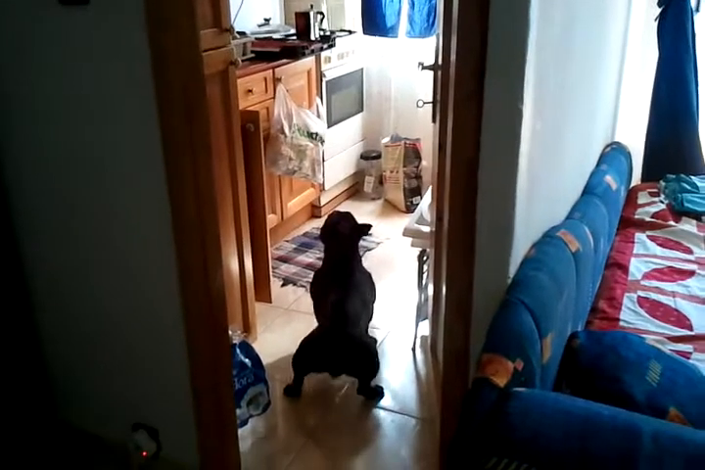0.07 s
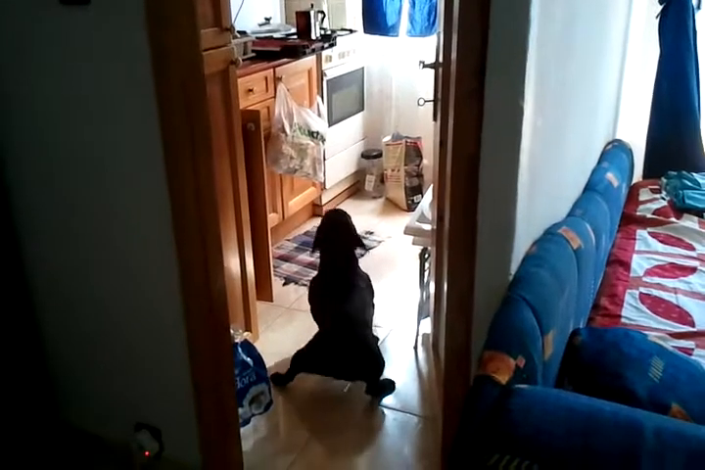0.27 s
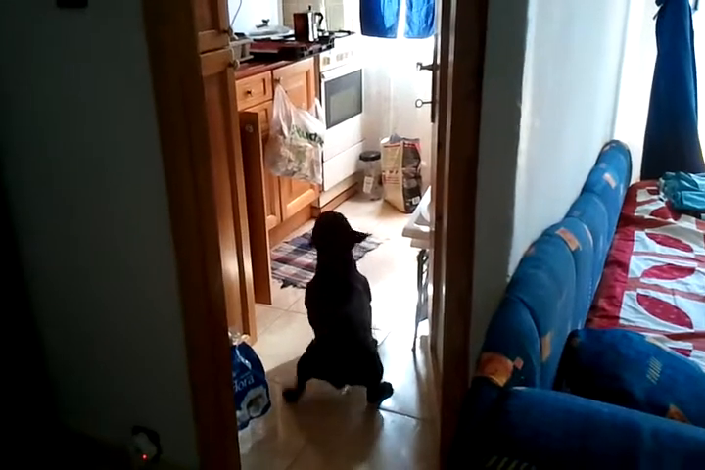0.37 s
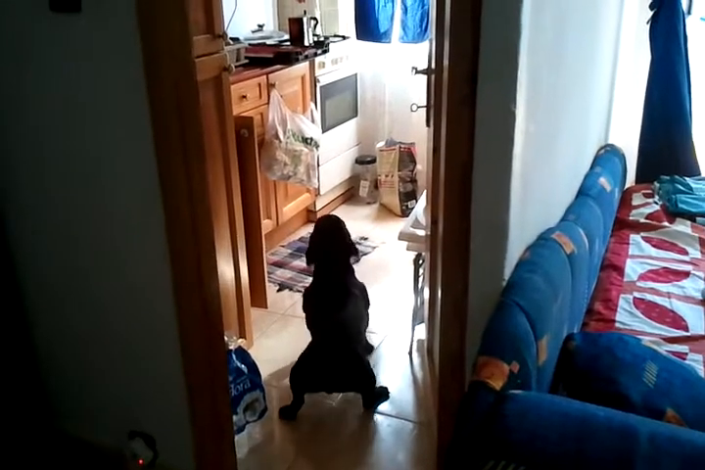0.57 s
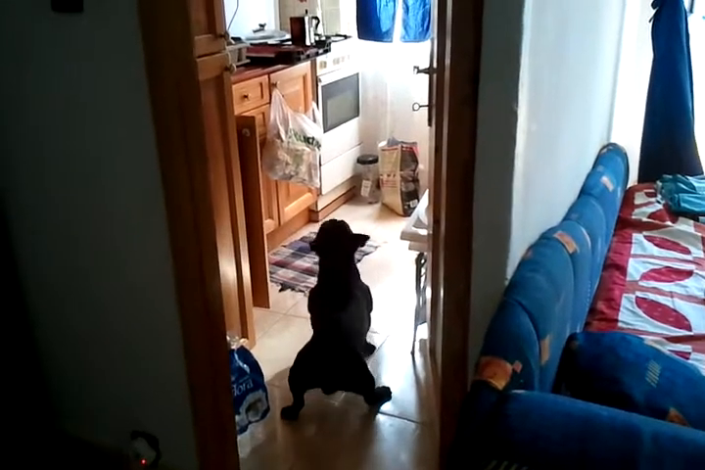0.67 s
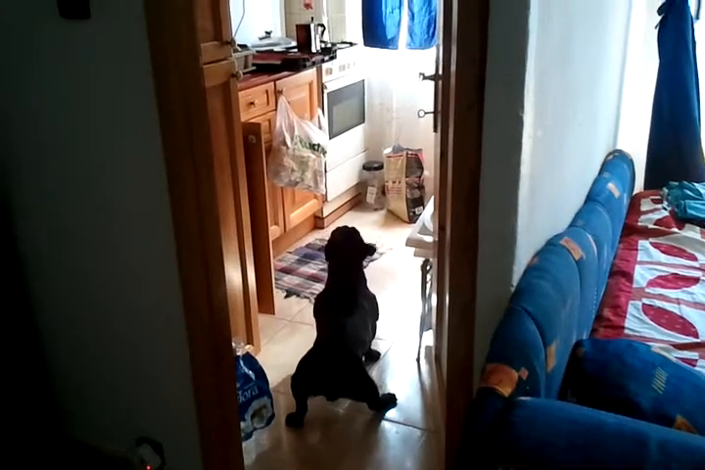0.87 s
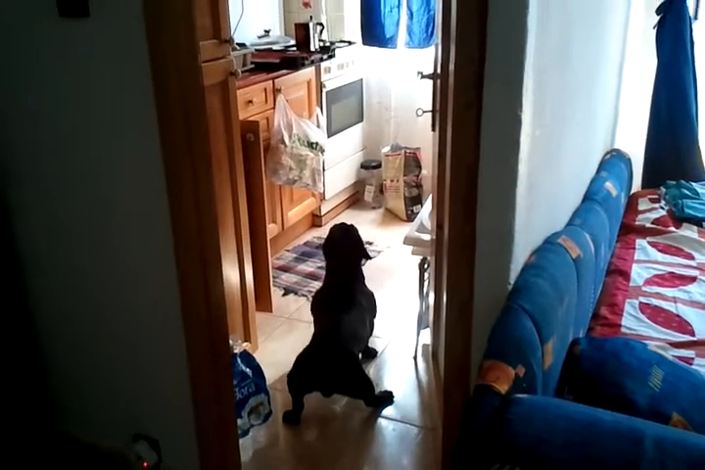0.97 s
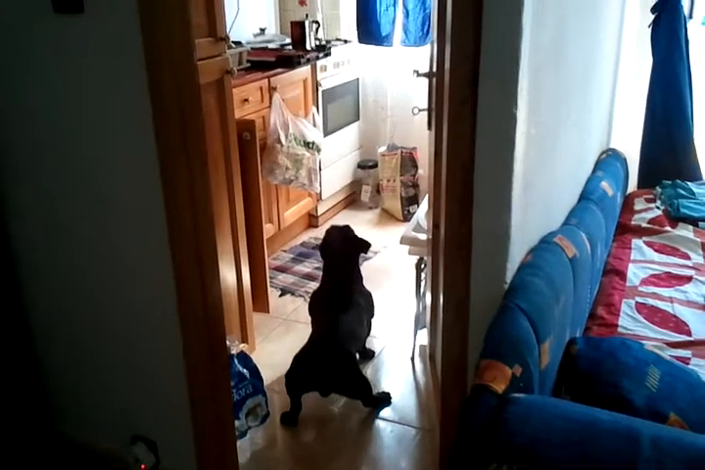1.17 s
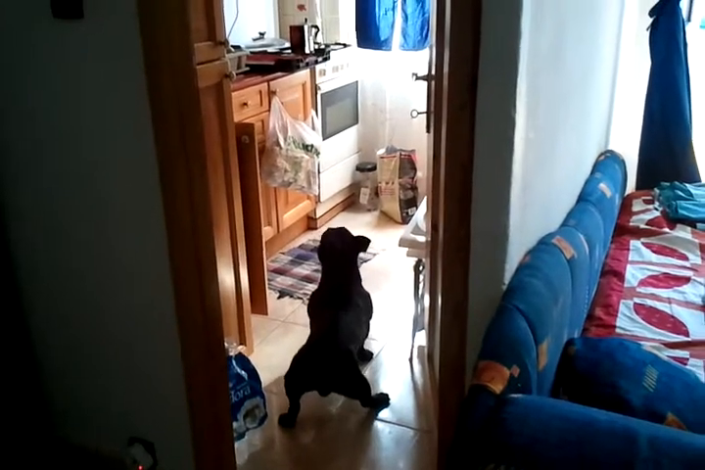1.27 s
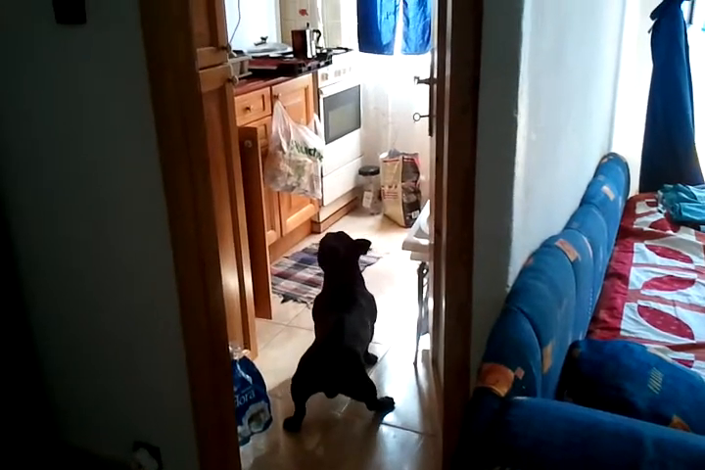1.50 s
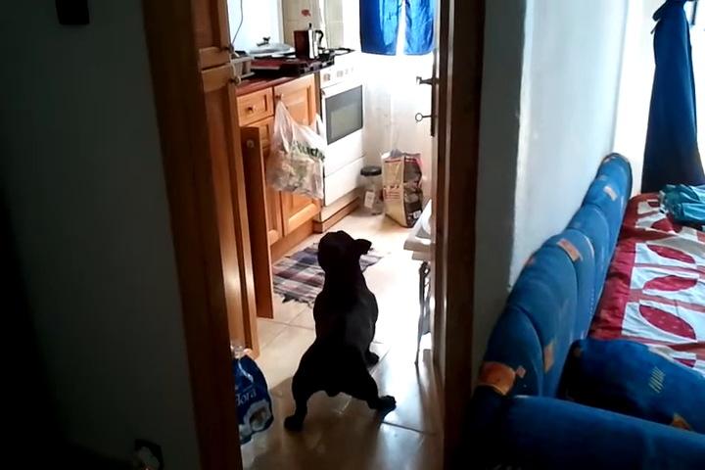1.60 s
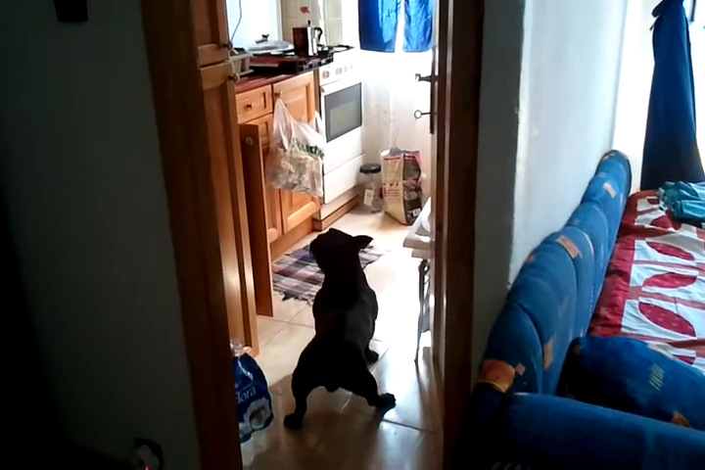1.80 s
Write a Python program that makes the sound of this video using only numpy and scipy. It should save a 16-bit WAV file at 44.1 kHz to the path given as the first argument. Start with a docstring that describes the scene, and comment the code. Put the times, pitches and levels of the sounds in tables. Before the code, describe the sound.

In a kitchen doorway, a small dog huffs out two quick, raspy barks. A soft, low growl and faint sniffing follow, with a little room echo and quiet background noise.

```python
"""In a kitchen doorway, a small dog gives two hoarse, huffing barks, then sniffs and growls softly.
Uneven throat pulses and puffs of air make its muzzle ring around one strong, shaky tone,
while more air rasps past its teeth. The growl is slower pulses behind a shut mouth.
The hard-floored rooms ring on at a few low notes, over a faint hum."""
import sys
import numpy as np
from scipy import signal
from scipy.fft import rfft, irfft
from scipy.io import wavfile
from scipy.ndimage import uniform_filter1d

SR = 44100
rng = np.random.default_rng(int(sys.argv[2]) if len(sys.argv) > 2 else 0)


def materialize(psi):
    """Save the field psi as 16-bit PCM at rate SR to the path in sys.argv[1].

    A 1-D psi becomes a single channel; in a 2-D psi each row is a channel.
    """
    bounded = np.clip(np.atleast_2d(psi).T, -1, 1)
    quanta = np.round(bounded * 32767).astype(np.int16)
    wavfile.write(sys.argv[1], SR, quanta)


N = 81585
T = np.arange(N) / SR


# Resonances (pitches that ring) of the muzzle: pitch_hz, width_hz, gain_db
MUZZLE_RESONANCES = [(1328, 300, -8), (1604, 88, -10), (1790, 194, -8), (2640, 420, -30.5)]
# The barks: start_s, rise_s, hold_until_s, fall_s, widest_mouth_s, level_db, swell_db, pitch_hz,
# jaw_open_hz, jaw_drop_hz, jaw_width_hz, chest_db, muzzle_sag_share, back_of_mouth_db
BARK_SHAPES = [(.216, 0.0028, .345, .045, .3, -37.5, 1, 300.7, 632, 49, 347, -9, 0.002, -4.5),
               (.515, 0.022, 0.66, 0.033, .625, -34, 8.5, 249.8, 612, 147, 208, -6.5, 0.14, -5.5)]
def bark(start, rise, until, fall, widest, level_db, swell_db, pitch_hz,
         jaw_hz, jaw_drop_hz, jaw_width_hz, chest_db, sag, back_db):
    """The opening mouth lifts level, pitch and jaw resonance; the muzzle rings lower as lips round."""
    moments = [start, widest, until + fall]
    shut = np.interp(T, moments, [1, 0, 1])
    rounding = np.interp(T, moments, [-.5, .5, 1])
    pulses = throat(pitch_hz * (1 + .25 * (.5 - shut)), jitter=.16, air_share=.7)
    jaw = gliding_resonance(pulses, jaw_hz - jaw_drop_hz * shut, jaw_width_hz)
    chest = from_db(chest_db - 12.5 * rounding) * resonance(pulses, hz=319, width_hz=173)
    back_of_mouth = (885, 295, back_db)
    muzzle = 0
    for k, (hz, width_hz, db) in enumerate([back_of_mouth] + MUZZLE_RESONANCES):
        ringing = gliding_resonance(pulses, hz * (1 - sag * rounding), width_hz)
        muzzle += from_db(db) * ringing * (-1) ** k
    level = envelope(start, rise, until, fall, level_db - swell_db * shut)
    voice = level * (jaw - chest - from_db(-4 * shut) * muzzle)
    return signal.sosfilt(signal.butter(2, 170, "high", fs=SR, output="sos"), voice)


def throat(hz, jitter, air_share):
    """The throat makes pulses of uneven spacing and strength, each followed by a puff of air."""
    cycles = np.cumsum(hz * np.exp(jitter * waver(np.mean(hz)))) / SR
    strength = from_db(2 * rng.standard_normal(N))[cycles.astype(int)]
    pulses = np.diff(np.floor(cycles), prepend=0) - hz / SR
    puffs = rng.standard_normal(N) * np.exp(-3 * (cycles % 1))
    return strength * (np.sqrt(1 - air_share) * rms_one(pulses) + np.sqrt(air_share) * rms_one(puffs))


# The strong tone inside each bark, one list of points per bark: time_s, pitch_hz, level_db
CORE_TONES = [
    [(.21, 310, -49), (.237, 331.3, -39.5), (.275, 388.5, -38), (.3, 443.8, -46), (.335, 492, -42.5),
     (.375, 566.6, -37.5), (.41, 594, -47)],
    [(.54, 489.6, -48), (.572, 517.3, -34), (.594, 529, -36), (.619, 577.5, -28.5), (.632, 590, -46),
     (.655, 610, -36), (.672, 481, -37), (.7, 447.3, -38.5), (.73, 453, -43)],
]
def core_tone(points, flutter):
    """One shaky tone of the voice climbs as the mouth opens; the throat's flutter chops it when loud."""
    times, hz, db = np.transpose(points)
    cycles = np.cumsum(np.interp(T, times, hz) * np.exp(.046 * waver(hz=188))) / SR
    effort_db = np.interp(T, times, db)
    loudest_db = max(point[2] for tone in CORE_TONES for point in tone)
    fade_s, flutter_range_db = .025, 14.5
    depth = np.clip(1 + (effort_db - loudest_db) / flutter_range_db, 0, 1)
    shaky_db = effort_db + 3.5 * waver(hz=119.8)
    level = envelope(times[0], fade_s, times[-1] - fade_s, fade_s, shaky_db)
    return level * (1 + depth * flutter) * np.sin(2 * np.pi * cycles)


# The breath in each bark: start_s, rise_s, hold_until_s, fall_s, air_db, flutter_hz, thrum_db
HUFF_SHAPES = [(0.205, 0.023, 0.32, 0.065, -44.5, 118.6, -57), (0.5, 0.032, 0.61, 0.077, -45.5, 94, -56.5)]
def huff(tone_points, start, rise, until, fall, air_db, flutter_hz, thrum_db):
    """The throat flutters, thrumming low and chopping both the core tone and the rushing air."""
    cycles = np.cumsum(flutter_hz * np.exp(.1323 * waver(flutter_hz))) / SR
    flutter = np.sin(2 * np.pi * cycles)
    rasp = envelope(start, rise, until, fall, air_db) * teeth_rasp(start, flutter)
    thrum = envelope(start, rise, until, fall, thrum_db) * flutter
    return rasp + thrum + core_tone(tone_points, flutter)


# Tone colour of air rushing past the teeth: pitch_hz, relative_db
TEETH_HISS = [(1000, 11), (2000, 12), (2400, 7), (2950, 3.5), (3300, 0), (4000, 5), (4800, 6), (5400, -1.5),
              (6300, 4), (7500, 6), (9500, 6.5), (12500, 1.5), (14500, -7)]
# Narrow resonances between teeth and lips: pitch_hz, width_hz, gain_db
TEETH_RESONANCES = [(2860, 280, -15.5), (4060, 340, -19.5), (4640, 220, -29), (7430, 170, -21),
                    (8880, 230, -17.5), (12300, 390, -20)]
def teeth_rasp(start, flutter):
    """Air hisses past the teeth, and the gaps begin to ring as the lips part."""
    air = rng.standard_normal(N)
    wander = 1 + .018 * waver(hz=13.4)
    ringing = sum(from_db(db) * gliding_resonance(air, hz * wander, width_hz)
                  for hz, width_hz, db in TEETH_RESONANCES)
    lips_apart = np.clip((T - start) / .065, 0, 1)
    return rms_one((coloured(air, TEETH_HISS) + ringing * lips_apart) * (1 + .25 * flutter))


def lip_pop(start_s=.2195, pitch_hz=643, ring_s=.039, level_db=-25):
    """The lips pop open on the first bark, and the trapped air rings the mouth."""
    age = np.maximum(T - start_s, 0)
    rise = np.minimum(2 * pitch_hz * age, 1)
    return rise * from_db(level_db - 60 * age / ring_s) * np.sin(2 * np.pi * pitch_hz * age)


# Muffled grunts around the barks: start_s, rise_s, hold_until_s, fall_s, chest_db, throat_db
GRUNT_SHAPES = [(0.187, 0.0071, 0.23, 0.024, -61.5, -50.5), (0.389, 0.018, 0.439, 0.015, -53, -78),
                (0.497, 0.034, .55, 0.012, -52, -43), (0.674, 0.015, 0.705, 0.043, -52.5, -68)]
def grunts():
    """A low voice behind nearly closed lips leads into each bark and trails after it."""
    pulses = throat(np.full(N, 196.4), jitter=.15, air_share=.72)
    chest = resonance(pulses, hz=230, width_hz=39)
    upper = throat_ring(pulses)
    return sum(envelope(*times, chest_db) * chest + envelope(*times, throat_db) * upper
               for *times, chest_db, throat_db in GRUNT_SHAPES)


# How the growl swells and sinks: time_s, effort_db, chest_resonance_hz
GROWL_CURVE = [(0.932, -61, 188), (1.021, -62.5, 177), (1.114, -58, 169), (1.15, -55, 194),
               (1.284, -56, 188), (1.32, -53, 176), (1.39, -50.5, 183), (1.465, -51, 165),
               (1.51, -55.5, 190), (1.63, -55, 170), (1.7, -58, 134), (1.85, -58.5, 132)]
def growl(pulse_hz=53.9, dulling_db_per_s=5.5):
    """Slow pulses behind a shut mouth sound brighter with effort, deeper and duller towards the end."""
    pulses = throat(np.full(N, pulse_hz), jitter=.15, air_share=.63)
    times, db, chest_hz = np.transpose(GROWL_CURVE)
    effort_db = np.interp(T, times, db, left=-120)
    chest = from_db(-5) * gliding_resonance(pulses, np.interp(T, times, chest_hz), width_hz=69)
    bright_db = -4 + .55 * (effort_db - db.max()) - dulling_db_per_s * (T - times.mean())
    return from_db(effort_db) * (chest + from_db(bright_db) * throat_ring(pulses))


# Resonances of the throat in grunts and the growl: pitch_hz, width_hz, gain_db
THROAT_RESONANCES = [(311.2, 48, 0), (534, 153, -0.5), (716, 206, -4.5)]
def throat_ring(pulses):
    """Pulses make the throat ring at several pitches at once."""
    return sum(from_db(db) * resonance(pulses, hz, width_hz) * (-1) ** k
               for k, (hz, width_hz, db) in enumerate(THROAT_RESONANCES))


# The sniffs: start_s, rise_s, hold_until_s, fall_s, level_db
SNIFF_SHAPES = [(.055, 0.034, 0.082, 0.024, -63.5), (0.826, 0.0063, 0.87, 0.0083, -60.5),
                (0.953, 0.013, 1.012, 0.084, -58.5), (1.06, 0.03, 1.143, 0.069, -62),
                (1.21, 0.021, 1.248, 0.14, -66), (1.57, 0.075, 1.743, 0.033, -67)]
# Tone colour of air in the nose: pitch_hz, relative_db
NOSE_HISS = [(600, -35), (1100, 0.5), (1800, -3), (2400, -12), (3200, -8), (4200, -4.5), (6000, -8),
             (7400, -1), (8800, 4.5), (11000, -4.5), (14300, -15.5)]
# Thin whistles in the nose: start_s, rise_s, hold_until_s, fall_s, level_db, pitch_hz
NOSE_WHISTLES = [(.94, .05, 1.07, 0.059, -70.5, 1705), (1.09, 0.036, 1.31, .06, -77, 4120)]
def sniffs():
    """Soft rushes of air pass through the dog's nose, which whistles faintly."""
    whistles = sum(envelope(*shape) * resonance(rng.standard_normal(N), hz, width_hz=100)
                   for *shape, hz in NOSE_WHISTLES)
    air = coloured(rng.standard_normal(N), NOSE_HISS)
    return air * sum(envelope(*shape) for shape in SNIFF_SHAPES) + whistles


# Low notes the rooms ring at: pitch_hz, ring_s (time to fade by 60 dB), gain_db
ROOM_NOTES = [(122.6, 1, 14), (153.7, 0.78, 16), (199, 0.68, 14), (314.2, 0.41, -4), (380.4, 0.24, 1.5),
              (469, 0.44, -5.5), (572, 0.19, -3)]
# How long the echo lasts, from low to high: pitch_hz, ring_s
ECHO_TIMES = [(150, 0.62), (500, 0.32), (1600, 0.49), (4000, 0.63), (12000, 0.5)]
def room(sound, delay_s=.004):
    """The sound arrives directly, then as a blur of echoes and a few low, ringing notes."""
    tail, edges = 0, np.geomspace(60, 16000, 9)
    for low, high in zip(edges, edges[1:]):
        band_filter = signal.butter(2, [low, high], "band", fs=SR, output="sos")
        band = signal.sosfilt(band_filter, rng.standard_normal(N))
        ring_s = at_hz(ECHO_TIMES, np.sqrt(low * high))
        band *= from_db(-60 * T / ring_s) * (T > delay_s)
        tail += rms_one(band) * np.sqrt(2 * (high - low) / SR / N)   # equal energy per Hz
    echoes = signal.fftconvolve(sound, tail)[:N]
    notes = sum(from_db(db) * ring(sound, hz, np.log(1000) / (np.pi * ring_s))
                for hz, ring_s, db in ROOM_NOTES)
    return from_db(-3.5) * sound + from_db(-5) * echoes + notes


# Tone colour of the room's rumble and hiss: pitch_hz, relative_db
ROOM_NOISE = [(12, -58), (25, 0.5), (60, -11.5), (130, -6.5), (300, -11), (420, -24), (640, -21.5),
              (1200, -23.5), (1600, -24), (2100, -29), (3100, -33.5), (8800, -31.5), (14300, -35.5)]
# Steady humming tones: pitch_hz, level_db
HUM_TONES = [(124, -75), (298, -65.5), (1556, -80)]
def background():
    """Quiet room noise and a faint hum lie under everything."""
    hum = sum(from_db(db) * np.sqrt(2) * np.sin(2 * np.pi * (hz * T + rng.random()))
              for hz, db in HUM_TONES)
    return from_db(-62) * coloured(rng.standard_normal(N), ROOM_NOISE) + hum


def ring(x, hz, width_hz):
    """Let through the sound near one pitch and weaken the rest."""
    r = np.exp(-np.pi * width_hz / SR)
    feedback = [1, -2 * r * np.cos(2 * np.pi * hz / SR), r * r]
    return signal.lfilter(np.array([1, 0, -1]) * (1 - r * r) / 2, feedback, x + 1e-18)


def resonance(x, hz, width_hz):
    """Pick out one pitch steeply, at an even level."""
    wider_hz = width_hz * 1.47   # filtering twice narrows it again
    return evened(ring(ring(x, hz, wider_hz), hz, wider_hz))


def gliding_resonance(x, hz, width_hz):
    """Pick out a moving pitch steeply, at an even level."""
    turn = np.exp(2j * np.pi * np.cumsum(hz) / SR)
    r = np.exp(-np.pi * width_hz / SR)
    smoothed = signal.lfilter([(1 - r) ** 2], [1, -2 * r, r * r], x / turn)
    return evened(np.real(turn * smoothed))


def envelope(start, rise, until, fall, db):
    """A level that rises in a straight line, holds, then falls."""
    return from_db(db) * np.clip((T - start) / rise, 0, 1) * np.clip(1 - (T - until) / fall, 0, 1)


def waver(hz):
    """A random wobble at about this rate, about 1 in size."""
    return rms_one(uniform_filter1d(rng.standard_normal(N), size=int(SR / hz)))


def coloured(x, colour):
    """Give a sound a tone colour, at level 1."""
    hz = np.arange(N // 2 + 1) * SR / N
    return rms_one(irfft(rfft(x) * from_db(at_hz(colour, hz)), N))


def at_hz(points, hz):
    """Read between a table's rows, with octaves evenly spaced."""
    pitches, values = np.transpose(points)
    return np.interp(np.log(hz + 1e-9), np.log(pitches), values)


def evened(x):
    """Hold the level near 1 from moment to moment."""
    return x / np.sqrt(np.abs(uniform_filter1d(x * x, size=1300)) + 1e-12)


def rms_one(x):
    """Scale the average (rms) level to 1."""
    return x / np.sqrt(np.mean(x ** 2) + 1e-20)


def from_db(db):
    """Turn decibels into a multiplier."""
    return 10 ** (np.asarray(db) / 20)


def scene():
    """The dog, heard through the rooms, over the background."""
    barks = sum(bark(*shape) for shape in BARK_SHAPES)
    huffs = sum(huff(tone, *shape) for tone, shape in zip(CORE_TONES, HUFF_SHAPES))
    dog = barks + huffs + lip_pop() + grunts() + sniffs() + growl()
    return (room(dog) + background())[None]


def record(dry, cutoff_hz=14500):
    """Cut off the highest treble steeply."""
    return signal.sosfilt(signal.ellip(12, .1, 80, cutoff_hz, fs=SR, output="sos"), dry)


dry = scene()
out = record(dry)
materialize(out)
```